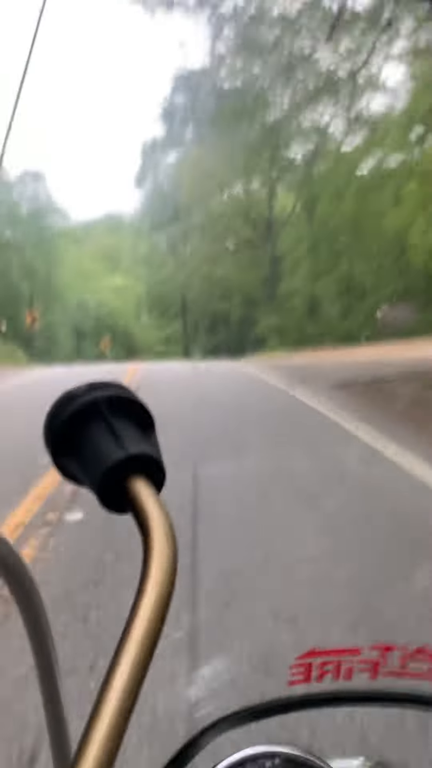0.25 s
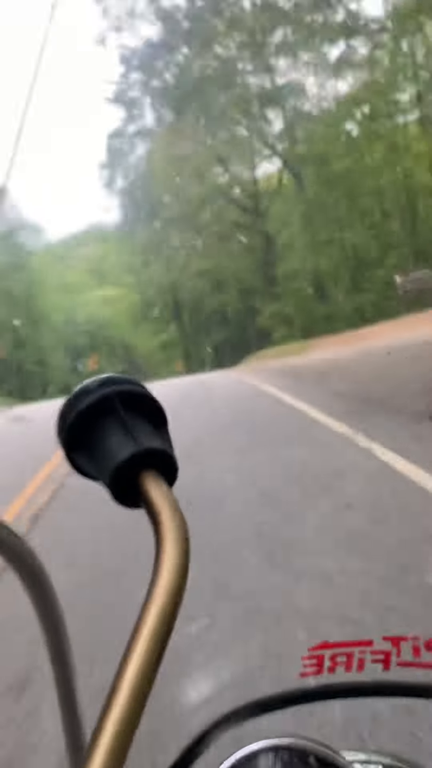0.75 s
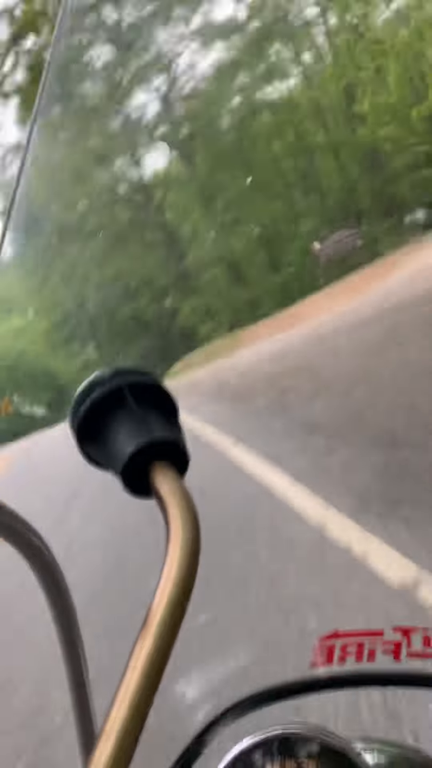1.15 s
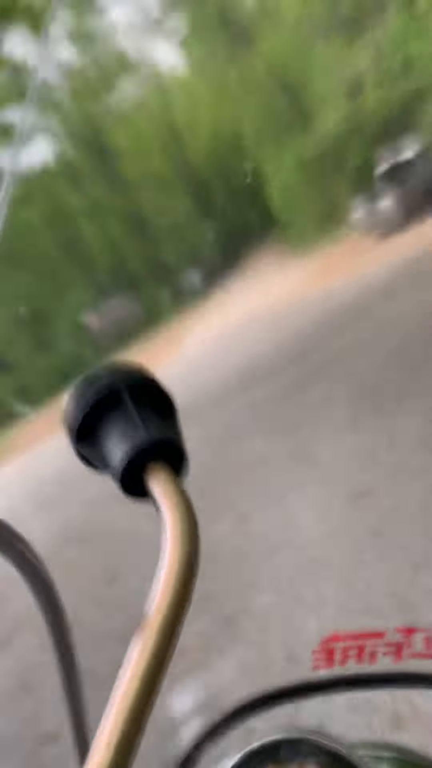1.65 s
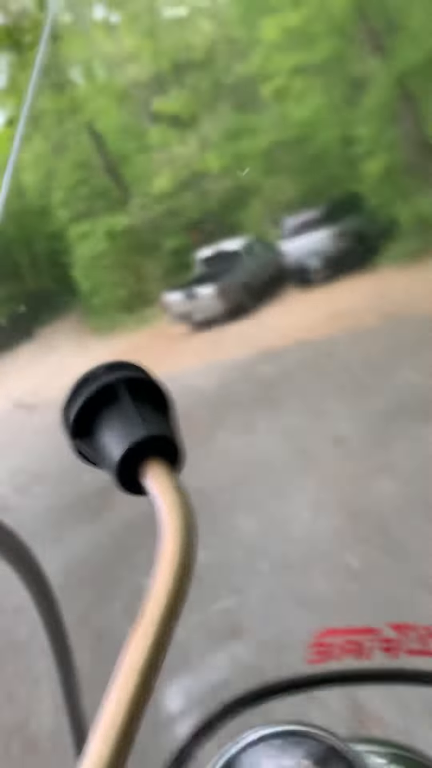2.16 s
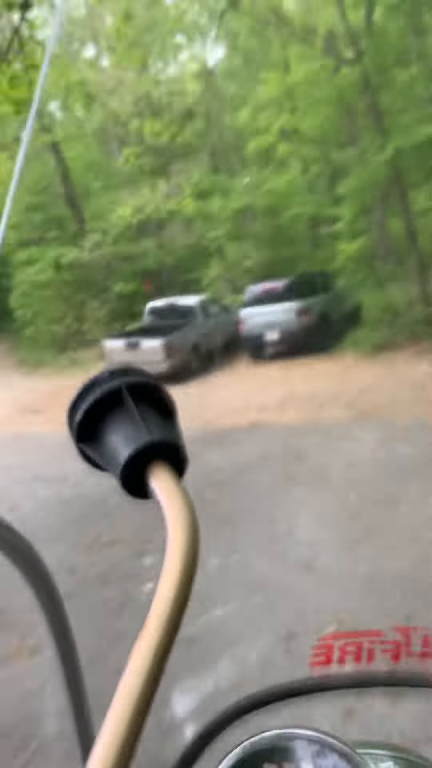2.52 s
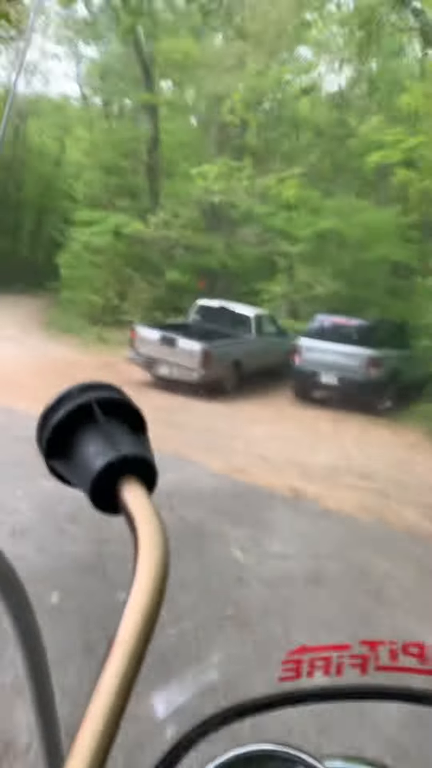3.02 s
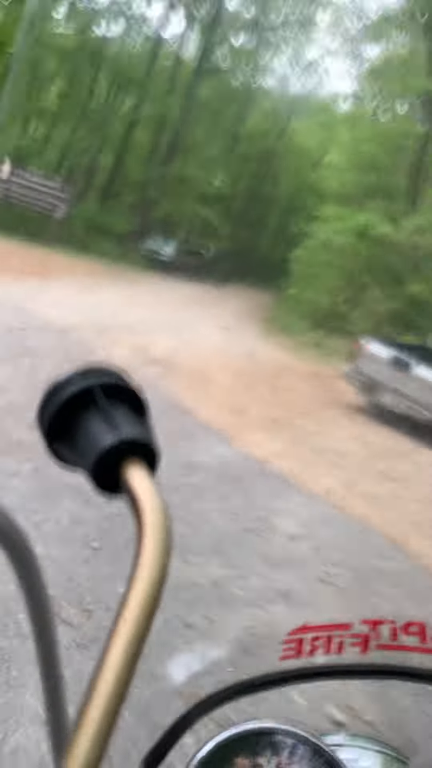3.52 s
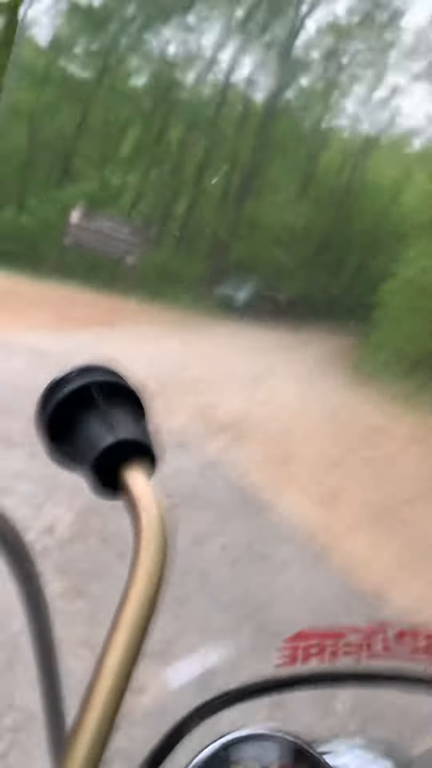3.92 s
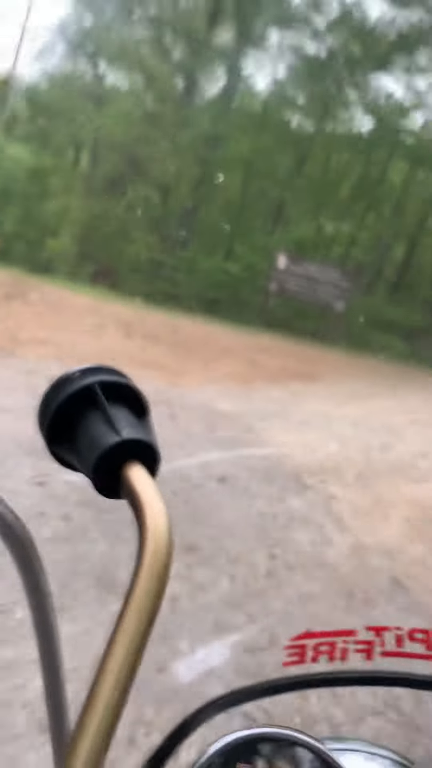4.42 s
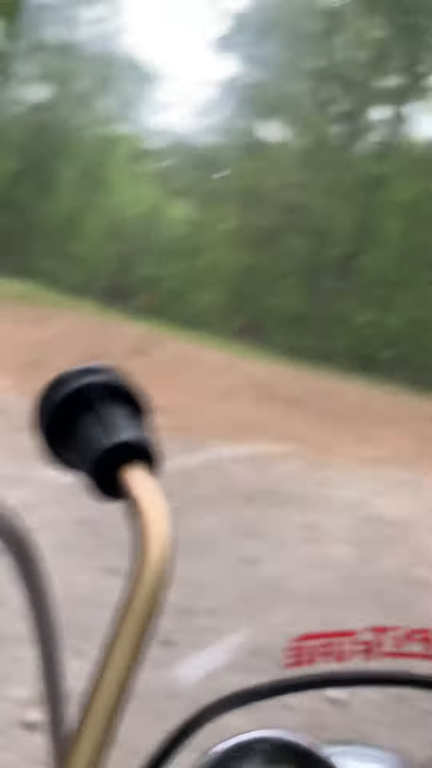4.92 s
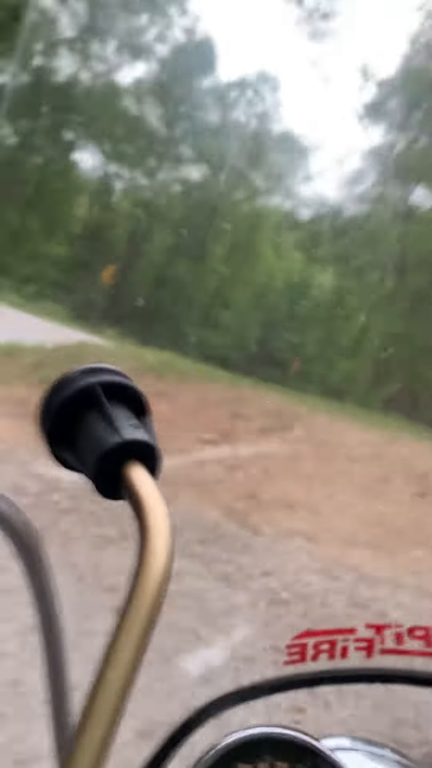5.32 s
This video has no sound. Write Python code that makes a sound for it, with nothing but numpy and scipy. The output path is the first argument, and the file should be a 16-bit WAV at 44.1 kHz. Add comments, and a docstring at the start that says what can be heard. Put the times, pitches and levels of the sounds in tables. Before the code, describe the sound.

A motorcycle is heard close up from the rider's seat, outdoors. One quick twist of throttle lifts the engine while wind rushes over the microphone and small metal parts jingle. The bike then coasts, its engine growling and stumbling downward with a few knocks as the wind fades. It settles into a low, thumping idle with tapping valves, while the tyres crunch faintly on gravel and a few stones tick against it.

```python
"""A motorcycle, heard from the rider's seat. A metal part pings, then one twist of throttle makes the
engine honk while wind rushes and small parts jingle. The bike coasts through a bend: the engine growls
and stumbles, the drive knocks and the wind fades. From about 2.5 s it settles to an idle on gravel,
and stones tick against it. All along, pushes of gas on every turn of the crank (the engine's main
shaft) make the exhaust pipe ring, while valves tap and gears whirr."""
import sys
import numpy as np
from scipy import signal
from scipy.fft import rfft, irfft, next_fast_len
from scipy.io import wavfile
from scipy.ndimage import uniform_filter1d

SR = 44100
rng = np.random.default_rng(int(sys.argv[2]) if len(sys.argv) > 2 else 0)


def bounce(signal):
    """Save signal as a 16-bit WAV file at the path given by the first command-line argument."""
    frames = np.transpose(np.atleast_2d(signal))
    limited = np.clip(frames, -1, 1)
    pcm = np.round(limited * 32767).astype(np.int16)
    wavfile.write(sys.argv[1], SR, pcm)


N = 245637
T = np.arange(N) / SR
SIZE = 2 * next_fast_len(N // 2 + SR // 4)  # extra room for filters to ring out
FREQ = np.fft.rfftfreq(SIZE, 1 / SR)
LEFT_RIGHT = np.array([[1], [-1]])

# tone of tiny hard hits, for gravel and rattles: f/Hz, level/dB
GRIT_TONE = [(1500, -28.5), (4000, 8.5), (6500, -1.5), (10500, -0.5), (15500, -8)]


def undb(db):
    """Turn decibels into a number to multiply by."""
    return 10 ** (np.asarray(db) / 20)


def curve(table):
    """Join the (time, value) rows of a table with straight lines."""
    return np.interp(T, *np.transpose(table))


def unit(x):
    """Scale a sound to an average strength (rms) of 1."""
    return x / np.sqrt(np.mean(x ** 2))


def steady(x):
    """Even out slow changes in loudness but keep the single beats."""
    span = SR // 6
    power = uniform_filter1d(uniform_filter1d(x ** 2, span), span)
    return x / np.sqrt(np.maximum(power, 1e-18))


def colour(x, tone):
    """Make each frequency louder or softer, following rows of f/Hz, level/dB."""
    hz, db = np.transpose(tone)
    gain = undb(np.interp(np.log(np.maximum(FREQ, 1)), np.log(hz), db))
    return irfft(rfft(x, SIZE) * gain)[:N]


def resonate(x, modes):
    """Let a sound ring an object at its own pitches; the result has strength 1."""
    response = sum(undb(db) / (1 + 2j * (FREQ - hz) / width) for hz, width, db in modes)
    return unit(irfft(rfft(x, SIZE) * response)[:N])


def wander(per_s):
    """A smooth random wobble of strength 1, with per_s new values a second."""
    step = max(int(SR / per_s), 1)
    stairs = np.repeat(rng.standard_normal(N // step + 1), step)[:N]
    return unit(uniform_filter1d(stairs, step))


def noise(tone, side_db):
    """Stereo noise of strength 1; a higher side_db makes left and right differ more."""
    mid, side = (colour(rng.standard_normal(N), tone) for _ in range(2))
    side = colour(side, [(300, -43.5), (700, -17), (1200, 5), (2400, 4.5), (5000, -31.5), (16000, -32)])
    return unit(mid + undb(side_db) * side * LEFT_RIGHT)


def impulses(times, sizes):
    """One-sample clicks at the given times."""
    inside = (times > 0) & (times < T[-1])
    return np.bincount((times[inside] * SR).astype(int), sizes[inside], N)


def bursts(hits, attack_s, crack_t60, tail_t60, crack_db, tail_db):
    """Loudness outline of hits, each a crack and a tail; t60 is the seconds taken to fade by 60 dB."""
    outline = np.zeros(N)
    for s, db in hits:
        start = int(s * SR)
        t = T[:N - start][:SR // 5]
        fade = undb(crack_db - 60 * t / crack_t60) + undb(tail_db - 60 * t / tail_t60)
        outline[start:start + len(t)] += undb(db) * (1 - np.exp(-t / attack_s)) * fade
    return outline


def airflow_db(fade_db_per_s=6, gust_s=.64, gust_width_s=.44):
    """How hard the air blows: a fading headwind and one gust over calm air."""
    headwind = undb(-51.5 - fade_db_per_s * T)
    gust = undb(-51) * np.exp(-((T - gust_s) / gust_width_s) ** 2)
    calm = undb(-65.5)
    return 10 * np.log10(headwind ** 2 + gust ** 2 + calm ** 2)


def hiss(calm_db=-62, boost_db=3):
    """Air hisses at the microphone opening, fluttering more the harder it blows."""
    # tone of the hiss: f/Hz, level/dB
    hiss_tone = [(2500, 4), (4400, 9), (6200, 8.5), (7400, 3.5), (9200, -10), (10100, 6.5), (11100, 1),
                 (11700, 0), (12700, 3.5), (15500, -2)]
    air_db = airflow_db()
    flutter_db = .1 * np.maximum(air_db - calm_db, 0) + .8
    return noise(hiss_tone, side_db=-71.5) * undb(air_db + boost_db + flutter_db * wander(130))


def gravel(count=70, arrive_s=2.56, blend_s=.96):
    """Leaving the asphalt, the tyres roll with a hollow crunch and fling faint grains."""
    # tone of tyres on gravel: f/Hz, level/dB
    tyre_tone = [(300, 4.5), (550, 1), (740, 10), (950, -10), (1500, -37), (2500, -40.5), (6500, -15.5),
                 (15000, -59)]
    when, chance = rng.random((count, 2)).T
    grain_db = -43 - 3 * np.log(np.maximum(chance, np.exp(-2)))
    grains = colour(impulses(when * T[-1], undb(grain_db)), GRIT_TONE)
    roll = noise(tyre_tone, side_db=20) * undb(-50.5 + 2.5 * wander(30))
    fade_in = (1 + np.tanh((T - arrive_s) / blend_s)) / 2
    return (roll + grains) * fade_in


def stones():
    """Flung stones tick against the motorcycle."""
    # stone hits: t/s, level/dB
    stone_hits = [(3.2484, -53), (4.118, -56), (4.143, -50), (4.1544, -47), (4.179, -51), (4.2054, -50),
                  (4.359, -42), (4.365, -46)]
    # tone of a stone: f/Hz, level/dB
    stone_tone = [(1500, -9), (3200, -2), (4500, 4), (6200, 7), (8000, -5), (10800, 0), (15500, 1.5)]
    outline = bursts(stone_hits, attack_s=.0001, crack_t60=.024, tail_t60=.14, crack_db=-3.5, tail_db=-21)
    return noise(stone_tone, side_db=-15) * outline


def ping(start_s=.103, hz=1968, t60=.45, db=-48):
    """A jolted metal part rings with one fading tone."""
    t = np.maximum(T - start_s, 0)
    return np.sin(2 * np.pi * hz * t) * undb(db - 60 * t / t60)


def fittings(turns):
    """Small metal parts chatter twice a turn in the airflow and break into short jingling rattles."""
    # rattles: t/s, level/dB
    rattles = [(.1022, -47), (.381, -32.5), (.485, -38), (.542, -37), (.575, -36), (.602, -32.5),
               (.648, -34.5), (.733, -32.5), (.8215, -40), (1.8292, -56)]
    # pitches the parts ring at: f/Hz, width/Hz, level/dB
    jingle_modes = [(6200, 34, -7), (7200, 22, -15.5), (10000, 120, 0.5), (10600, 31, -2),
                    (10700, 61, -3.5), (11460, 74, 0), (14800, 70, -6.5)]
    shake = bursts(rattles, attack_s=.0038, crack_t60=.053, tail_t60=.3, crack_db=-1, tail_db=-16.5)
    buzz = undb(airflow_db() - 6)
    chatter = 1 + .5 * np.cos(4 * np.pi * turns)
    grit = noise(GRIT_TONE, side_db=-14)
    jingle = resonate(rng.standard_normal(N), jingle_modes)
    return (shake + buzz) * chatter * undb(-4) * (grit + jingle)


def clatter(turns, count=500, throb=.1):
    """Chains and gears whirr, a little louder once a turn; their loose contacts ring the engine case."""
    # pitches the case rings at: f/Hz, width/Hz, level/dB
    case_modes = [(1764, 22, 14), (1900, 41, -1.5), (2027, 25, 17), (2186, 28, 17.5), (2660, 20, 8),
                  (2850, 17, 6.5), (3020, 12, -1.5), (3328, 18, 10), (3660, 28, 12.5), (3880, 27, -2),
                  (6000, 24, 7.5)]
    # tone of the whirr: f/Hz, level/dB
    whirr_tone = [(150, -16.5), (400, 7), (560, 10), (750, -0.5), (1050, -0.5), (1500, 4), (2100, -1),
                  (2600, -5.5), (3400, -4), (4400, -8), (5400, -65.5), (8000, -11), (16000, -62)]
    times, shared = rng.random(count) * T[-1], rng.standard_normal(count)
    contacts = [impulses(times, shared + rng.standard_normal(count)) for _ in range(2)]
    ring = np.array([resonate(side, case_modes) for side in contacts])
    whirr = undb(-54) * noise(whirr_tone, side_db=-5.5) + undb(-64) * ring
    return whirr * undb(wander(17)) * (1 + throb * np.cos(2 * np.pi * (turns - .55)))


def valves(turns, scatter_db=2.3, side_db=1.5, contact_s=.0012, slack_s=.0007, detune=.018):
    """Each valve tap comes once in two turns and rings briefly, never quite at the same pitch."""
    # valve taps: crank angle/turns, f/Hz, t60/s, level/dB
    taps = [(1.4, 1020, .032, -45.5), (1.45, 1260, .014, -55), (.33, 780, .04, -48), (.67, 765, .04, -47.5),
            (1.15, 670, .03, -53), (1.65, 750, .035, -51), (.36, 1130, .018, -55), (.81, 1235, .025, -53),
            (.45, 1480, .025, -54), (.24, 1770, .04, -55), (1.23, 1740, .03, -56.5), (1.42, 3340, .04, -59)]
    out, t = np.zeros((2, N + SR)), T[:SR // 10]
    for angle, hz, t60, db in taps:
        times = np.interp(np.arange(angle, turns[-1], 2), turns, T)
        outline = undb(-60 * t / t60) * (1 - np.exp(-t / contact_s))
        for s, (late, size, lean, pitch) in zip(times, rng.standard_normal((130, 4))):
            start = max(int((s + slack_s * late) * SR), 0)
            ring = np.sin(2 * np.pi * hz * (1 + detune * pitch) * t) * outline / outline.max()
            tap_db = db + scatter_db * size + side_db * lean * LEFT_RIGHT
            out[:, start:start + len(t)] += ring * undb(tap_db)
    return out[:, :N]


def drive(turns, revs, scatter_db=4, slack_turns=.03):
    """Above idle the slack drive slaps once a turn and now and then knocks hard; its metal rings."""
    # hard knocks: t/s, level/dB
    knock_hits = [(.412, -26), (1.135, -30), (1.354, -26), (1.415, -32), (1.626, -28), (1.908, -33)]
    # pitches the drive rings at: f/Hz, t60/s, level/dB
    drive_modes = [(960, 0.1, -8), (1010, 0.037, -5), (1275, 0.051, -12), (1585, 0.072, -23),
                   (2130, 0.02, -18.5), (2190, 0.024, -29), (2660, 0.085, -23.5), (3400, 0.033, -17),
                   (3690, 0.071, -20.5), (5940, 0.21, -30.5)]
    late, size, *ring_chance = rng.standard_normal((260, 2 + 2 * len(drive_modes))).T
    times = np.interp(np.arange(len(late)) + slack_turns * late, turns, T)
    sizes = undb(-33 + scatter_db * np.tanh(size)) * np.interp(times, T, revs)
    knock_s, knock_db = np.transpose(knock_hits)
    knocks = impulses(knock_s, undb(knock_db))
    out, t = np.zeros((2, N)), T[:SR // 10]
    for k, (hz, t60, db) in enumerate(drive_modes):
        ring = np.sin(2 * np.pi * hz * t) * undb(db - 60 * t / t60)
        for side in range(2):
            slaps = impulses(times, sizes * undb(2 * ring_chance[2 * k + side]))
            out[side] += signal.fftconvolve(slaps + knocks, ring)[:N]
    return out


def wind(turns, throb=.068):
    """Air rushes past the windscreen, pulsing with the engine, and rumbles on the microphone."""
    # tone of the rush: f/Hz, level/dB
    rush_tone = [(100, -13.5), (200, -23), (420, 13.5), (540, -14), (700, 8.5), (1000, 12), (1250, 9.5),
                 (1550, -2), (2100, 1), (2800, -9), (4400, -4.5), (6000, -45.5), (16000, -64)]
    # tone of the rumble: f/Hz, level/dB
    rumble_tone = [(20, -26.5), (40, -5), (65, 1), (130, -1), (260, 0.5), (400, -15), (700, -21.5),
                   (3000, -75.5)]
    rush = noise(rush_tone, side_db=-7) * undb(-8 + 1.97 * wander(45.3))
    rumble = unit(colour(rng.standard_normal(N), rumble_tone)) * undb(5 + wander(18))
    return rush * (1 + throb * np.cos(2 * np.pi * (turns - .8))) + rumble


def combustion(speed, idle_hz=25.6, stumble_hz=46, stumble_octaves=.6):
    """Revs, load (effort) and unevenness, each 0-1: the engine stumbles most at middle speeds."""
    revs = np.clip((speed - idle_hz) / (speed.max() - idle_hz), 0, 1)
    load = revs ** .3
    stumble = np.exp(-(np.log2(speed / stumble_hz) / stumble_octaves) ** 2)
    return revs, load, .07 + .58 * stumble


def pushes(turns, load, uneven, limp_db=0, limp_turns=.015, scatter_db=4, jitter_turns=.055):
    """Gas pushes on each turn; every other turn limps, and uneven firing scatters size and timing."""
    # one turn's pushes: crank angle/turns, idle level/dB, loaded level/dB, turn-to-turn idle swing/dB
    one_turn = [(.057, -40, -11, 0), (.33, -36, -4.8, 0), (.578, 2, -28, .4), (.646, -9, -28, -4.5),
                (.841, -.8, -3, -1), (.905, -5.3, -28, 2.2)]
    # hard firings while coasting: t/s, boost/dB
    pops = [(.868, -2.5), (.96, -25.5), (1.36, -25), (1.632, -2.5), (1.958, -0.5), (2.111, -9.5),
            (2.219, -7), (2.331, -12), (2.456, 0), (2.526, 2.5)]
    angle, idle_db, load_db, swing_db = np.tile(np.transpose(one_turn), 260)
    turn = np.arange(len(angle)) // len(one_turn)
    angle = angle + turn
    late, size = rng.standard_normal((len(angle), 2)).T
    load, uneven = np.interp(angle, turns, load), np.interp(angle, turns, uneven)
    limp = np.sin(np.pi * angle)
    times = np.interp(angle + limp_turns * load * limp + jitter_turns * uneven * late, turns, T)
    idling = (1 - load) * undb(idle_db + swing_db * (-1) ** turn)
    working = load * undb(load_db + limp_db * limp)
    sizes = (idling + working) * undb(scatter_db * uneven * np.tanh(size))
    for s, db in pops:
        sizes[np.argmin(abs(times - s))] += undb(db)
    return impulses(times, sizes)


def rasp(turns, load, uneven):
    """The air intake rasps along, gulping more evenly than the exhaust fires."""
    # tone of the intake: f/Hz, level/dB
    intake_tone = [(180, -1.5), (255, 12.5), (295, 4.5), (350, 13), (440, 18), (540, -1.5), (700, 6),
                   (1000, -7.5), (1280, -2), (1600, -27), (3000, -35), (7000, -23.5), (15000, -58.5)]
    gulps = pushes(turns, load, uneven / 4, limp_db=3, limp_turns=.03)
    return undb(-6) * steady(colour(gulps, intake_tone))


def growl(turns, waver_radians=.25):
    """As the engine brakes, every other turn differs: clean, wavering tones fall with the speed."""
    # growl tones: multiple of the crank speed, level/dB
    growl_tones = [(4.5, 4), (5, -14.5), (5.5, -12), (6.5, -18.5), (7, -14.5)]
    out = np.zeros(N)
    for multiple, db in growl_tones:
        tone = np.sin(2 * np.pi * multiple * turns + waver_radians * wander(10))
        out += tone * undb(db - 23 + wander(19))
    return out


def bark(turns, speed, revs, load, uneven, closing_s=.43):
    """The pushes honk while the throttle is open; it shuts at top speed and they turn to a hollow growl."""
    # tone with the throttle open: f/Hz, level/dB
    honk_tone = [(450, -30), (600, 4.5), (700, 11), (820, -5), (1000, -17), (2000, -41), (3200, -9.5),
                 (5000, -32), (12000, -56)]
    # tone while coasting: f/Hz, level/dB
    hollow_tone = [(180, -17), (235, 4), (290, 11.5), (345, -6), (420, -17.5), (560, -50), (800, -21),
                   (980, -10), (1120, -28.5), (1400, -27), (3000, -34.5), (9000, -68)]
    pulses = pushes(turns, load, uneven / 2, limp_db=3, limp_turns=.03)
    coasting_s = np.maximum(T - T[speed.argmax()], 0)
    throttle = np.exp(-(coasting_s / closing_s) ** 2)
    honk = undb(-40) * steady(colour(pulses, honk_tone))
    hollow = undb(-24) * steady(colour(pulses, hollow_tone))
    return revs * (throttle * honk + (1 - throttle) * (hollow + growl(turns)))


def delay_bass(x, hz=101, width_hz=66):
    """The silencer holds the bass back for a few milliseconds without making it weaker."""
    s = 1j * FREQ
    all_pass = (s * s - width_hz * s + hz ** 2) / (s * s + width_hz * s + hz ** 2)
    return irfft(rfft(x, SIZE) * all_pass)[:N]


def brighten(note):
    """The exhaust note grows brighter and duller over time."""
    # boost above about 200 Hz: t/s, level/dB
    upper_boost = [(0, -1.5), (.5, -3.5), (1, -0.5), (2.3, -2), (2.7, 5), (3.5, 1), (4.3, -1.5), (5.57, -1)]
    low = colour(note, [(140, 0), (200, -7), (300, -30)])
    return low + (note - low) * undb(curve(upper_boost))


def swing_left(note, lag_s=.00054, bass_loss=.48):
    """As the exhaust sound swings to the left, it reaches the right side later and weaker."""
    # exhaust direction: t/s, left minus right level/dB
    direction = [(0, 0), (3.2, 0), (4.3, 5), (5.57, 5.4)]
    pan_db = curve(direction)
    right = np.interp(T - lag_s * pan_db / pan_db.max(), T, note)
    both = np.array([note, right])
    # the bass bends round obstacles: it drops a little on both sides and leans less
    bass = np.array([colour(side, [(115, 0), (170, -30)]) for side in both])
    lean_db = LEFT_RIGHT * pan_db / 2
    return (both - bass) * undb(lean_db) + bass * undb(lean_db / 2 - bass_loss * pan_db)


def exhaust(turns, revs, load, uneven, push_s=.0042):
    """The pushes ring the pipe, longer and rounder under load; loose gas burbles when firing is uneven."""
    # tone of the pipe and silencer: f/Hz, level/dB
    pipe_tone = [(20, -41), (45, -6), (68, 2), (95, 10), (135, 3), (190, 10), (240, -1.5), (290, -10),
                 (345, -22.5), (440, -26), (560, -57.5), (1200, -107)]
    # tone of the loose gas: f/Hz, level/dB
    burble_tone = [(35, -30.5), (70, 10.5), (110, 1), (180, -4.5), (300, 2), (350, -8), (450, -11),
                   (560, -23), (1500, -67.5)]
    pulses = pushes(turns, load, uneven)
    note = -delay_bass(colour(pulses, pipe_tone))
    rounded = uniform_filter1d(note, int(push_s * SR))
    note = steady(note + load * (rounded - note))
    puffs = np.sqrt(np.abs(uniform_filter1d(pulses, SR // 120)))
    burble = steady(colour(puffs * rng.standard_normal(N), burble_tone))
    note = steady(note + uneven ** 2 * undb(-4) * burble)
    return swing_left(brighten(note)) * undb(-21.5 + 6.5 * revs - 2 * uneven)


def scene():
    """Mix engine, air and ground; engine speed sets load, stumble, loudness, rasp and rush."""
    # engine speed (a quick twist, a long coast, a sagging idle): t/s, crank turn rate/Hz
    crank_speed = [(0, 51.3), (.16, 50.1), (.35, 69), (.45, 79.4), (.83, 68.7), (1.35, 54.9), (1.82, 42.5),
                   (2.3, 34.79), (2.5, 28.44), (2.65, 25.52), (2.8, 24.48), (3.1, 24.22), (3.5, 24.14),
                   (3.85, 23.13), (4, 24.02), (4.3, 23.12), (4.47, 23.43), (4.8, 22.49), (5.35, 22.15),
                   (5.57, 21.81)]
    speed = curve(crank_speed)
    turns = np.cumsum(speed) / SR
    revs, load, uneven = combustion(speed)
    engine = exhaust(turns, revs, load, uneven) + bark(turns, speed, revs, load, uneven)
    metal = valves(turns) + clatter(turns) + drive(turns, revs) + ping()
    stone_ticks = stones()
    rush_gain = np.hypot(undb(-29) * revs ** .76, undb(-51))  # grows with the revs, faint at idle
    air = rush_gain * (wind(turns) + rasp(turns, load, uneven)) + hiss()
    return engine + metal + air + fittings(turns) + stone_ticks + gravel()


def record(dry, top_hz=15800):
    """The phone widens the treble by shifting its phase between left and right, and cuts the very top."""
    phase = np.pi * np.interp(FREQ, [2400, 4650, 6900, 8850, 11000, 13200, 15400], np.arange(7))
    wide = irfft(rfft(dry, SIZE) * np.exp(.5j * LEFT_RIGHT * phase))[:, :N]
    return signal.sosfilt(signal.ellip(10, .2, 80, top_hz, fs=SR, output="sos"), wide)


dry = scene()
out = record(dry)
bounce(out)
```